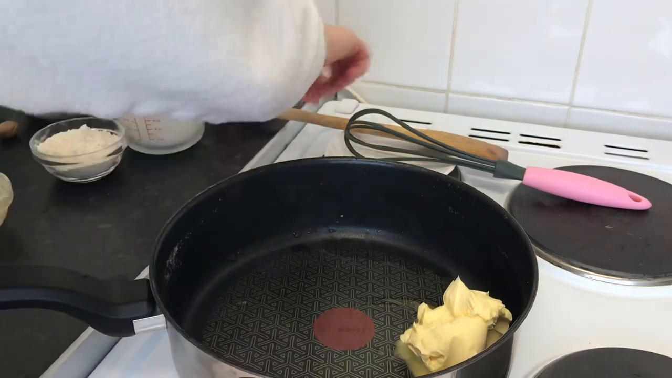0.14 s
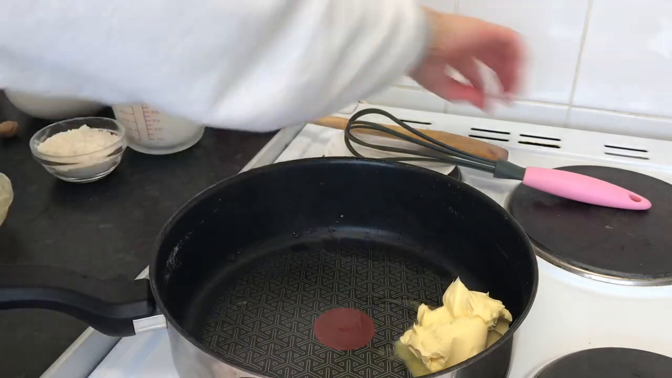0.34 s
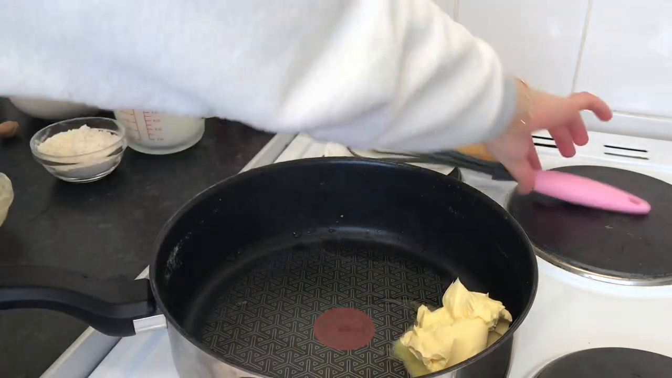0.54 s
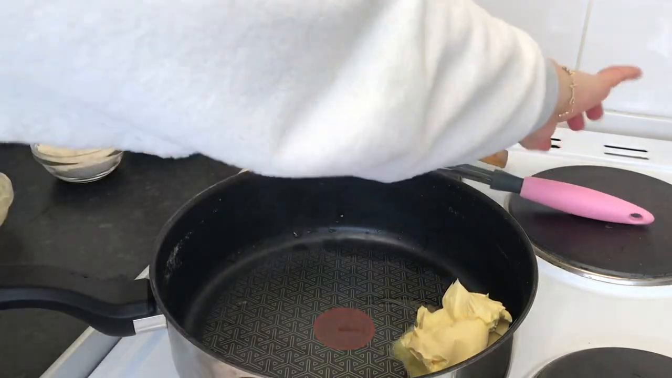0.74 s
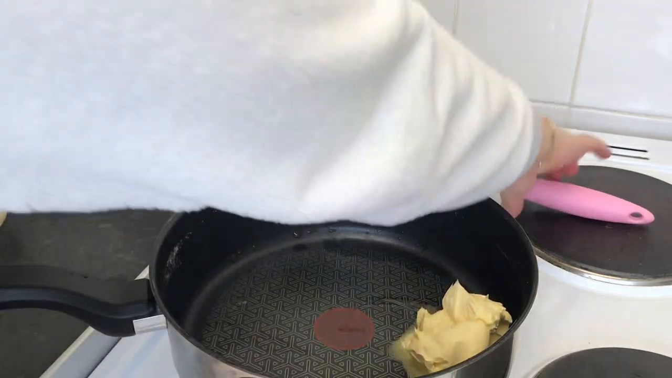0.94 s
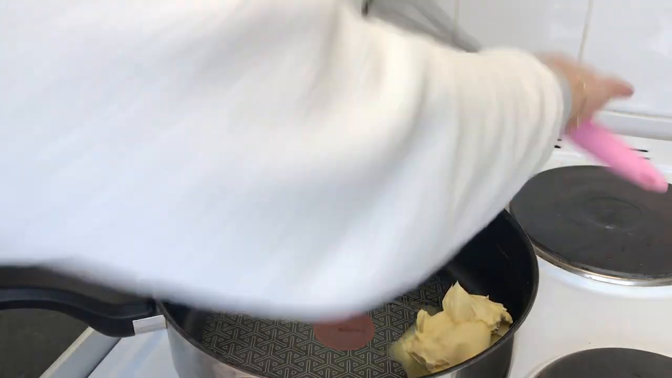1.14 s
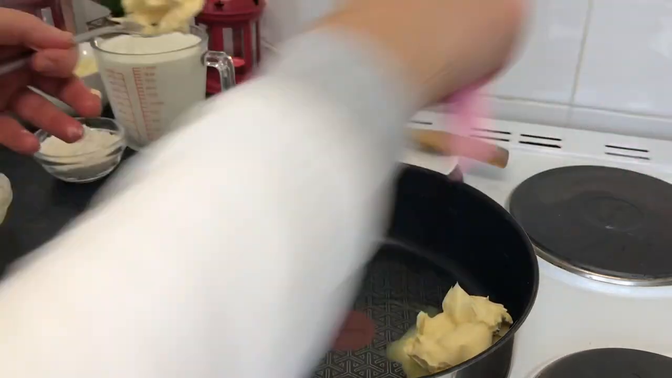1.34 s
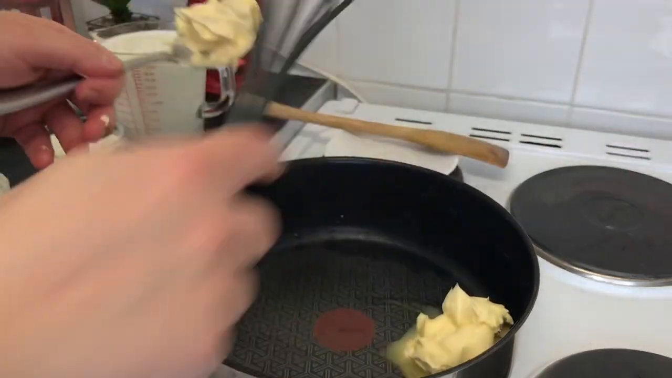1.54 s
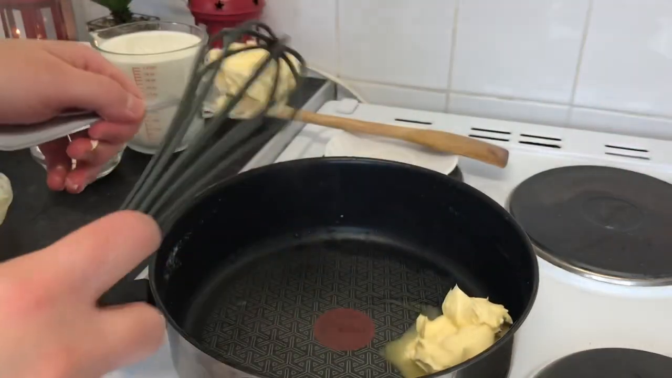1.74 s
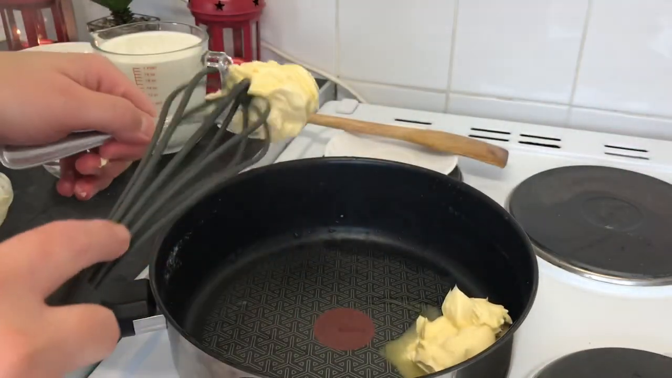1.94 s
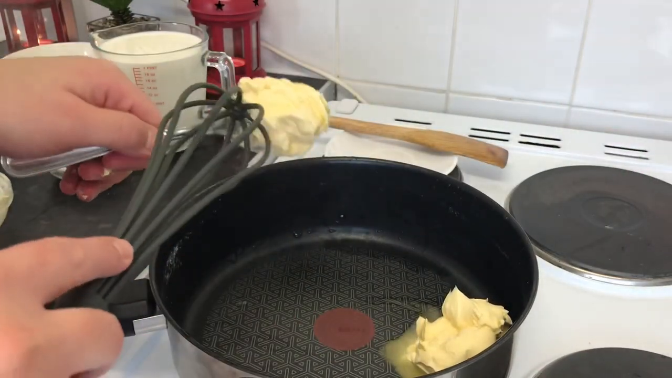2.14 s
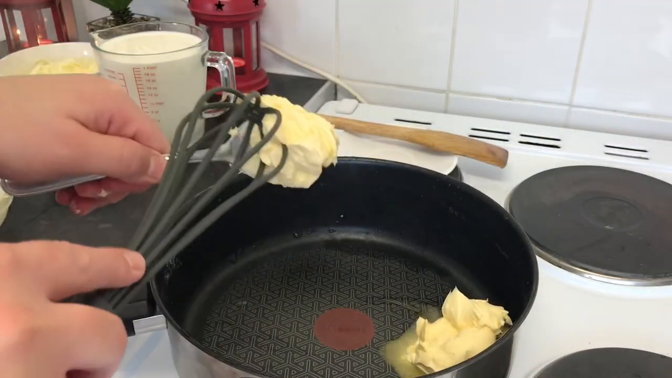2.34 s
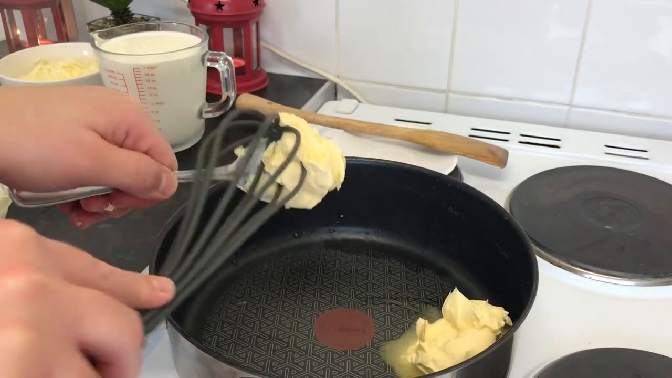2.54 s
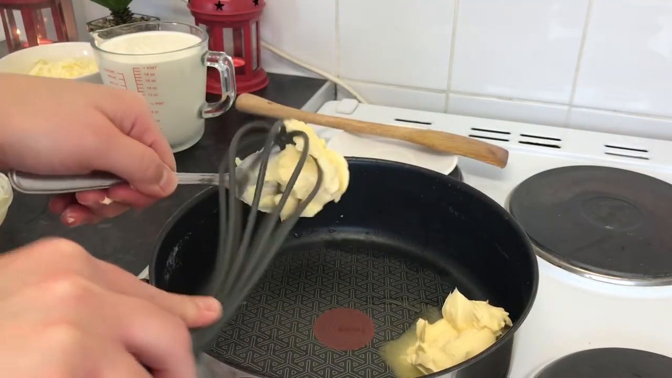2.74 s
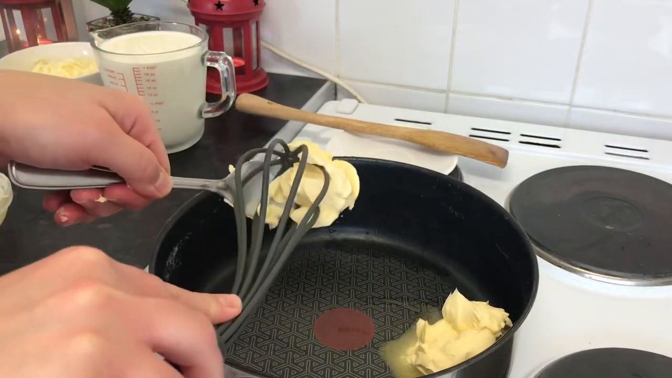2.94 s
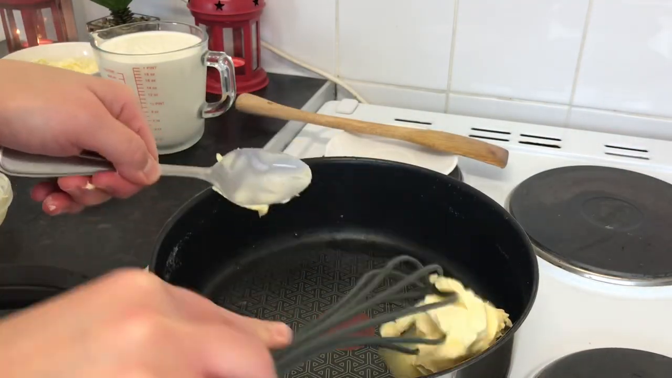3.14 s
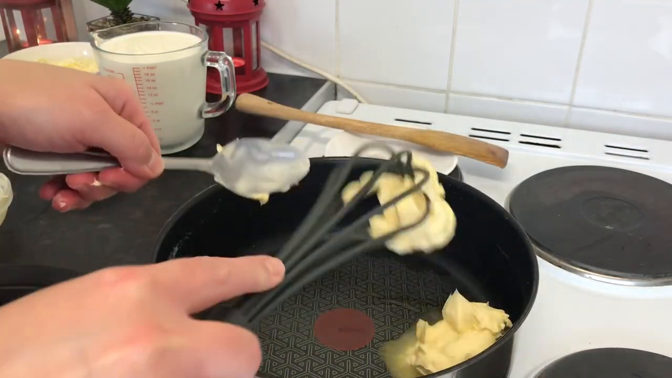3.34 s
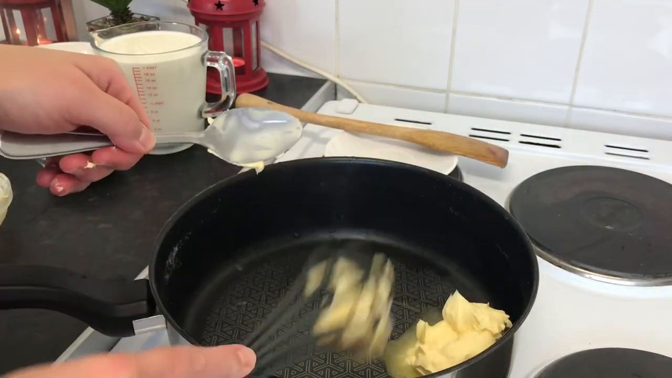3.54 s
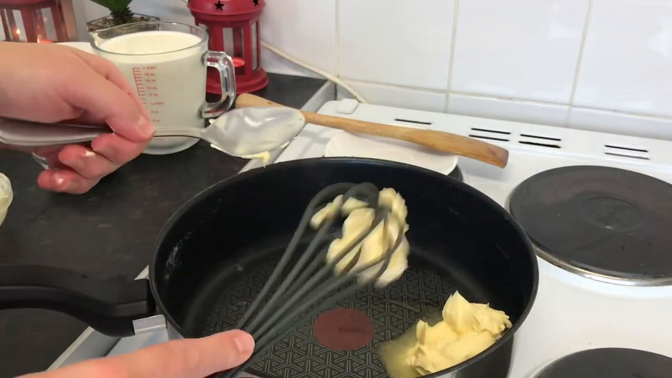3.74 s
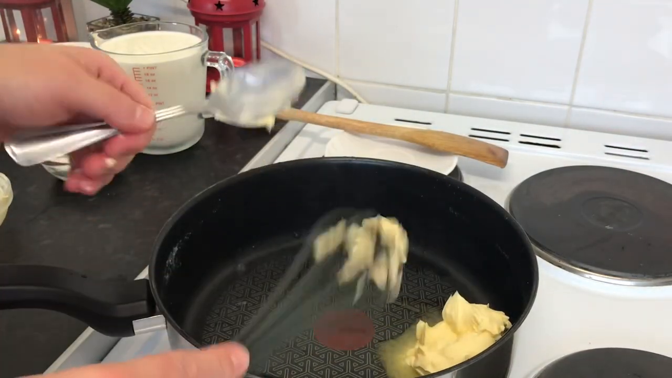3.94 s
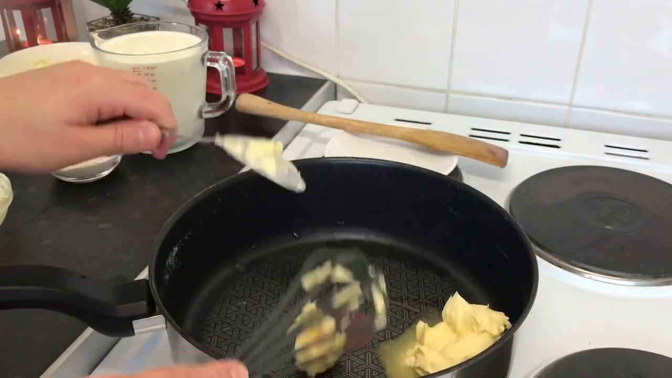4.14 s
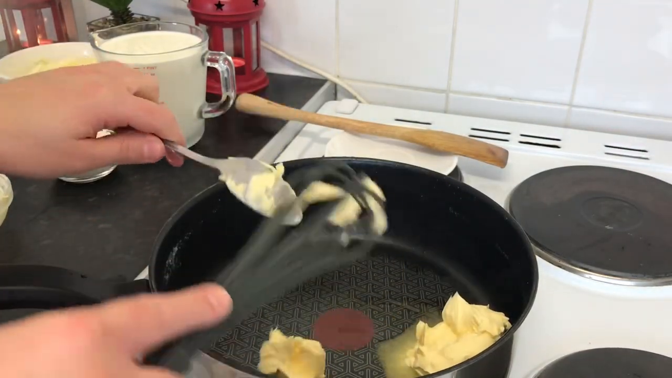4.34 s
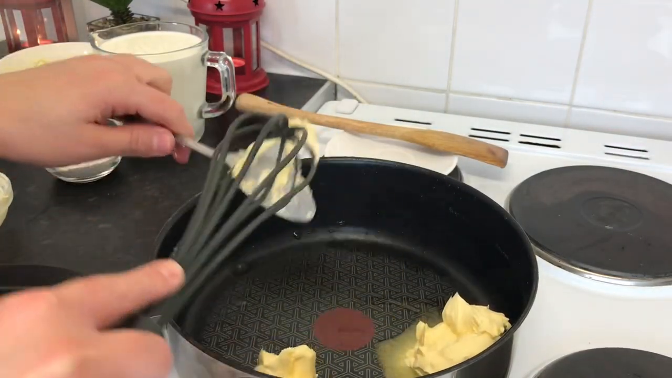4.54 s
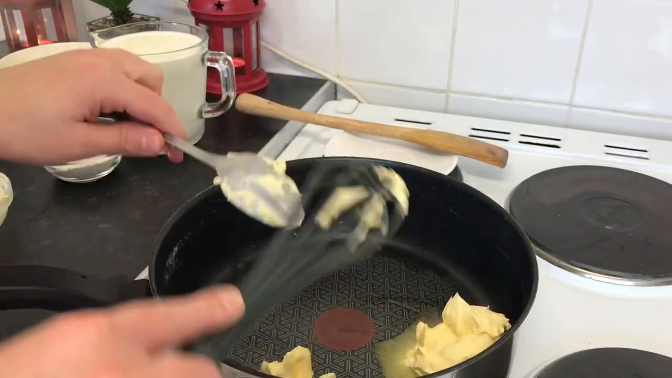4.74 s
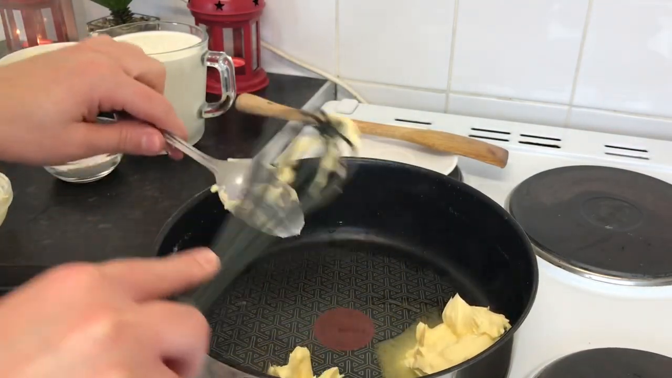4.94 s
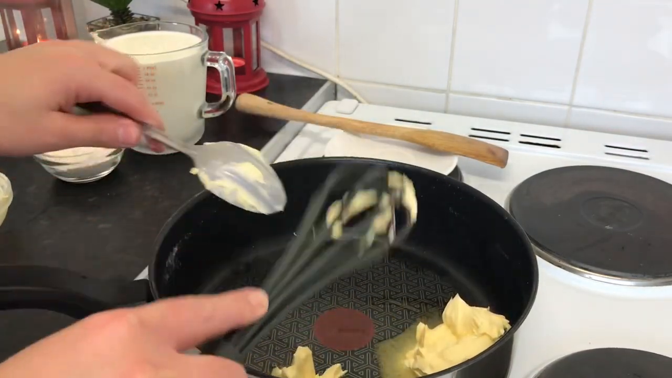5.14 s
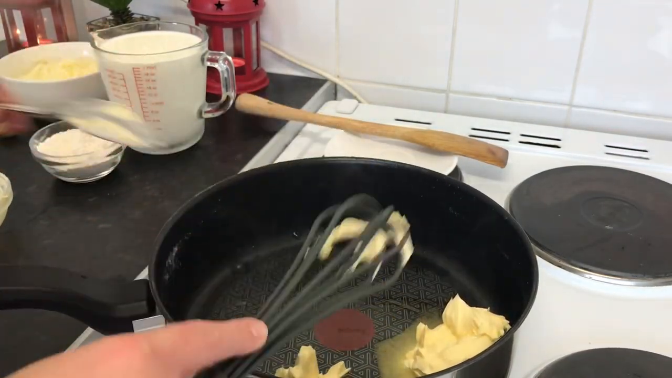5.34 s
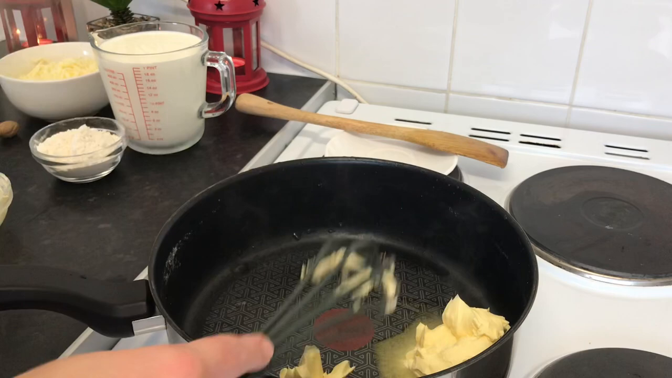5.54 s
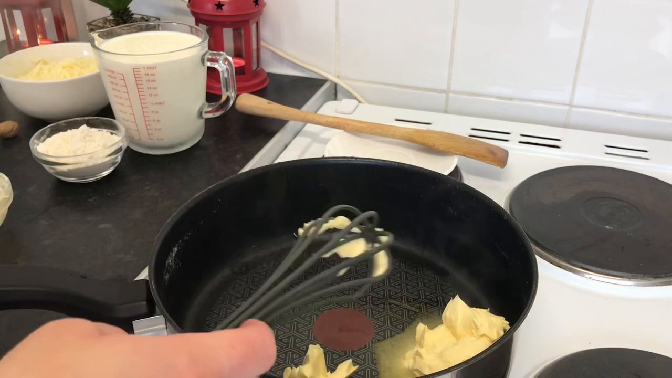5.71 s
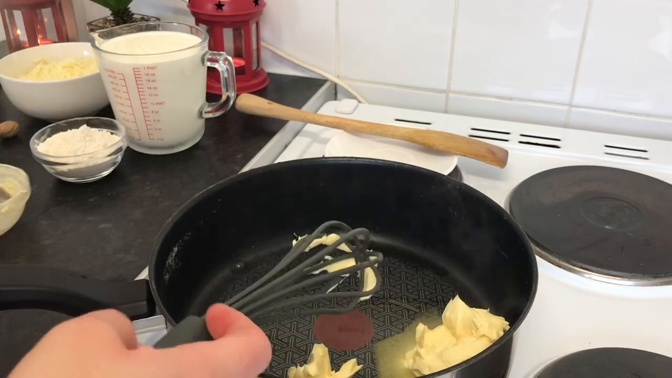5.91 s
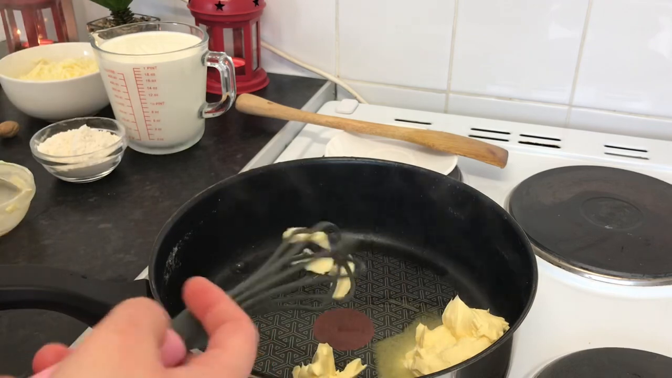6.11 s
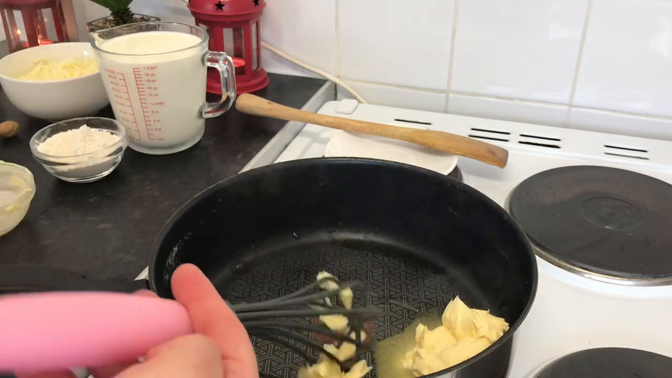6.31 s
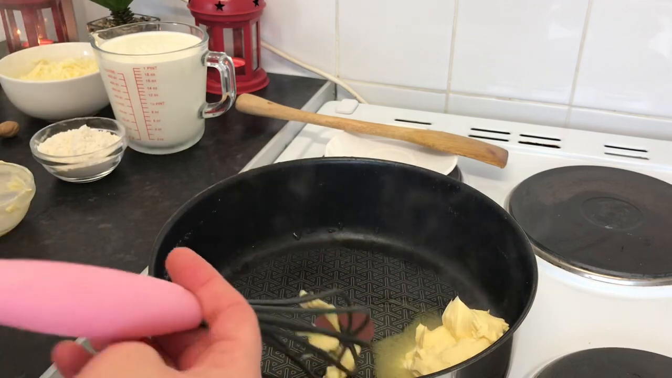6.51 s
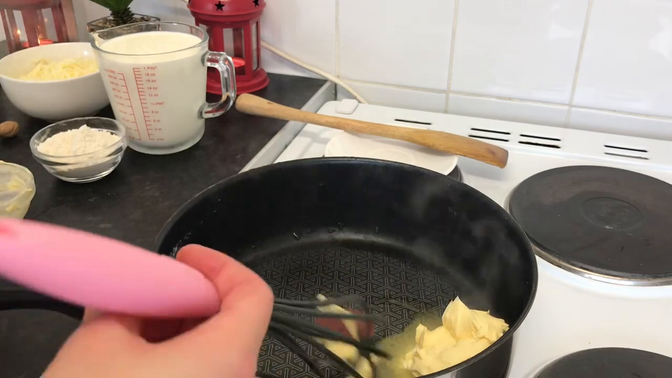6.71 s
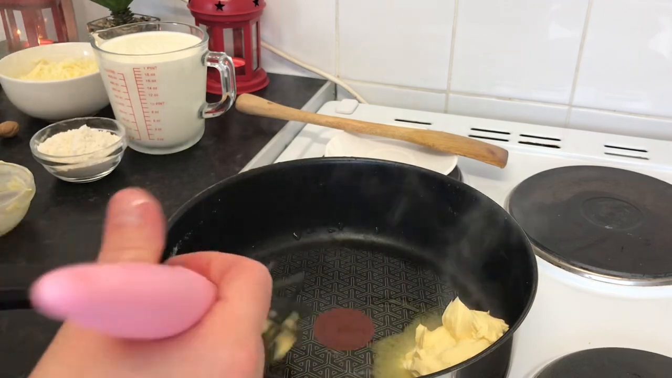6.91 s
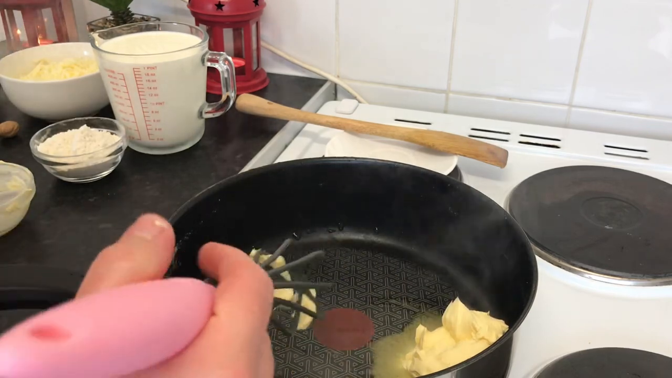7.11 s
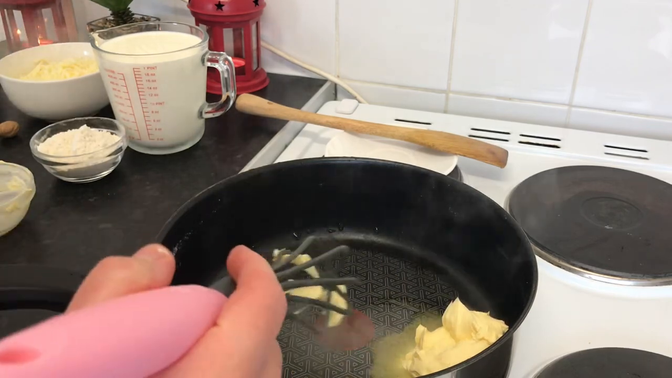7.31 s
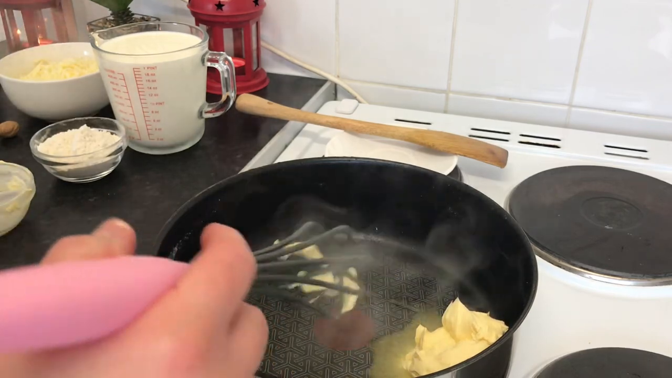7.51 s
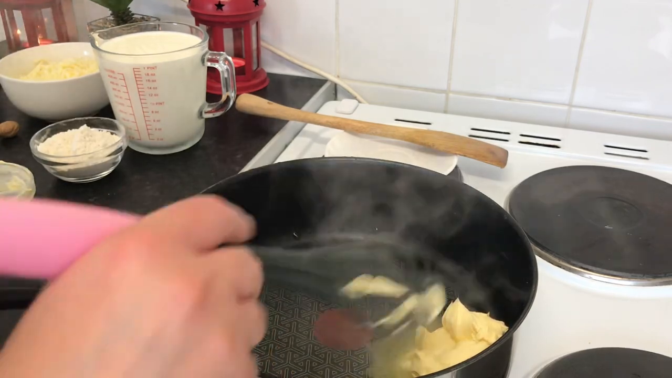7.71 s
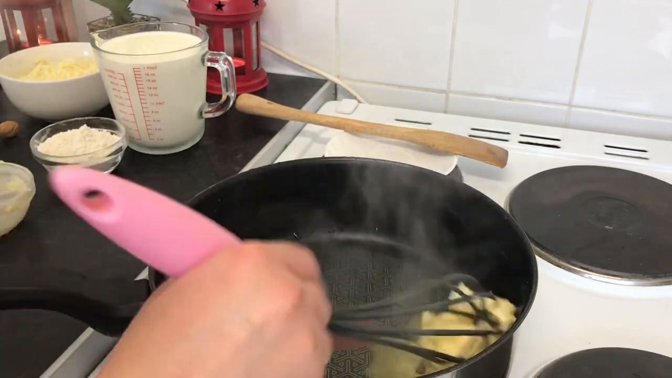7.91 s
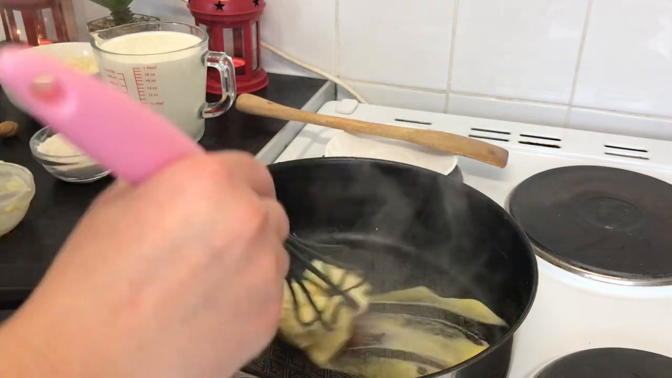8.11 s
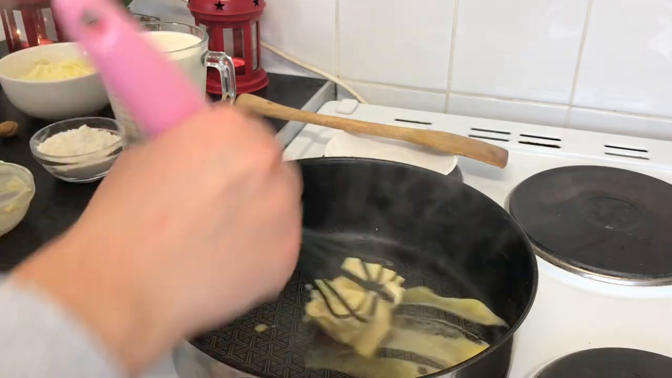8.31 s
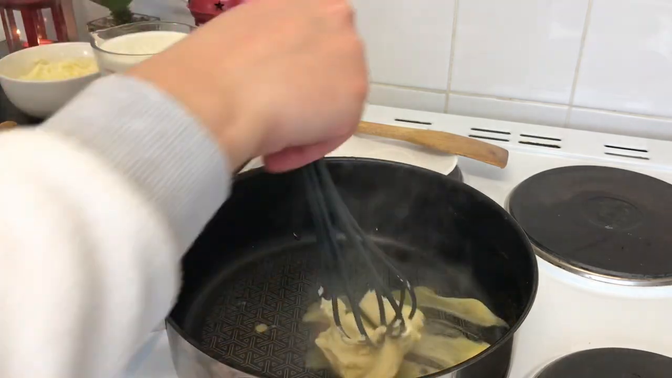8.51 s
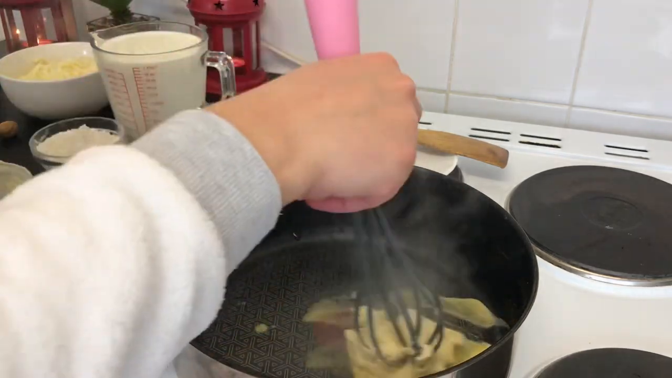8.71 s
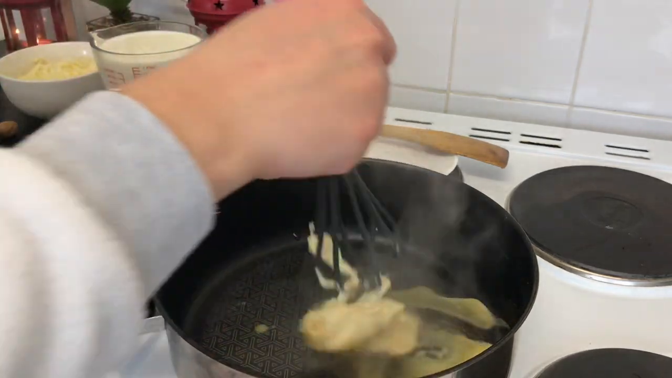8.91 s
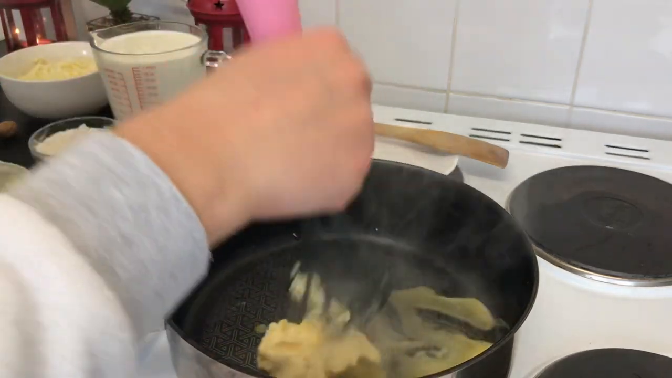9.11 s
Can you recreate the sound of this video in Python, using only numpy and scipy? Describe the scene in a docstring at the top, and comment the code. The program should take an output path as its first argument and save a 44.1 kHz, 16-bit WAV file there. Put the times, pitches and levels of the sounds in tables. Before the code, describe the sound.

Butter sizzles ever louder in a hot pan while a wire whisk is shaken, knocked on the pan, then stirred through the fizzing fat.

```python
"""Butter sizzles louder and louder in a hot nonstick pan, over a low room rumble and mains hum: crowds of random pops.
Early on a whisk bumps and scrapes the hob as it is picked up: coloured noise that dies away, and stick-slip pops.
Then it is shaken to fling butter off: its wires clash (noise through resonances) over dull thuds.
Next it knocks on the pan and bounces: clicks, pings and a ring of many sine waves.
Last it is stirred through the butter, which fizzes: quick narrow bands of pops that climb in pitch."""
import sys
import numpy as np
from scipy import signal
from scipy.fft import rfft, irfft, next_fast_len
from scipy.io import wavfile
from scipy.ndimage import map_coordinates

SR = 44100
rng = np.random.default_rng(int(sys.argv[2]) if len(sys.argv) > 2 else 0)


def materialize(psi):
    """Save the field psi as 16-bit PCM at rate SR to the path in sys.argv[1].

    A 1-D psi becomes a single channel; in a 2-D psi each row is a channel.
    """
    bounded = np.clip(np.atleast_2d(psi).T, -1, 1)
    quanta = np.round(bounded * 32767).astype(np.int16)
    wavfile.write(sys.argv[1], SR, quanta)


N = 403956  # length of the scene [samples]


def amp(db):
    """Turn decibels into a gain."""
    return np.exp(np.asarray(db) * np.log(10) / 20)


def unit(x):
    """Scale to an rms level of 1."""
    return x / np.sqrt(np.mean(x ** 2) + 1e-20)


def along(points, hz):
    """Read values between (frequency, value) points on a log frequency axis."""
    f, v = np.transpose(points)
    return np.interp(np.log(hz + 1), np.log(f + 1), v)


def wobble(rate):
    """A smooth random curve with rate random points a second."""
    count = int(N * rate / SR) + 2
    curve = map_coordinates(rng.standard_normal(count + 1), [np.linspace(0, count, 8 * count)])
    return np.interp(np.arange(N), np.linspace(0, N, len(curve)), curve)


def swell(s, half):
    """A bell curve in time: 1 at s, and 37 % at half seconds to either side."""
    return np.exp(-((np.arange(N) / SR - s) / half) ** 2)


def fade(rise, t60):
    """One second of a quick rise that dies away, by 60 dB in t60 seconds."""
    t = np.arange(SR) / SR
    return (1 - np.exp(-t / rise)) * np.exp(-np.log(1000) * t / t60)


def filtered(x, response):
    """Shape x with a gain for each frequency."""
    n = x.shape[-1]
    m = next_fast_len(n + SR // 4)
    return irfft(rfft(x, m) * response(np.fft.rfftfreq(m, 1 / SR)), m)[..., :n]


def peak(hz, centre, width):
    """Gain of one smooth peak, as of a resonance; width is half its bandwidth."""
    return 1 / np.sqrt(1 + ((hz - centre) / width) ** 2)


def noise(response, size):
    """Coloured noise of rms 1."""
    return unit(filtered(rng.standard_normal(size), response))


def spread(response):
    """One second of stereo noise; only its treble differs a little between the channels."""
    side = filtered(noise(response, SR), lambda hz: .25 * (hz > 4000))
    return noise(response, SR) + np.array([side, -side])


def dying(x, t60s):
    """Let each frequency of x die away at its own speed."""
    hz, t, z = signal.stft(x, SR, nperseg=256)
    z = z * np.exp(-np.log(1000) * t / along(t60s, hz)[:, None])
    return signal.istft(z, SR)[1][:len(x)]


def pops(rate, scatter_db, size=N):
    """Clicks at random moments, about rate a second, in unequal sizes."""
    bursts = rng.random(size) < rate / SR
    sizes = amp(scatter_db * rng.standard_normal(size))
    return unit(bursts * rng.choice([-1, 1], size) * sizes)


def add(track, s, sound):
    """Mix a sound into the track at time s."""
    part = track[..., round(s * SR):][..., :sound.shape[-1]]
    part += sound[..., :part.shape[-1]]


# colour of the low rumble: (frequency [Hz], relative level [dB per Hz])
RUMBLE_COLOUR = [(20, -28), (45, -6), (70, 3.5), (100, -6.5), (130, -6), (190, -3.5), (300, -5.5),
                 (500, -17.5), (1000, -20.5), (3000, -43)]
# mains hum: (frequency [Hz], level at the start [dB], level at the end [dB])
MAINS_HUM = [(99.5, -68, -67), (149, -73, -61.5), (197, -73, -71.5)]


def room_tone():
    """A low rumble of noise, with mains hum whose strength and pitch waver."""
    t = np.arange(N) / SR
    hum = np.zeros(N)
    for hz, start_db, end_db in MAINS_HUM:
        level_db = np.linspace(start_db, end_db, N) + 2.5 * wobble(3.3)
        hum += amp(level_db) * np.sqrt(2) * np.sin(2 * np.pi * hz * t + .5 * wobble(4))
    return hum + amp(-62) * noise(lambda hz: amp(along(RUMBLE_COLOUR, hz)), N)


# how long the room's answer lasts: (frequency [Hz], time to die by 60 dB [s])
ROOM_DECAY = [(150, 0.84), (1000, 0.18), (4000, 0.42), (12000, 0.14)]


def kitchen(x):
    """The tiled room answers with a dense tail that builds up over a few milliseconds."""
    tail = dying(rng.standard_normal(SR), ROOM_DECAY) * fade(rise=0.0046, t60=11)
    return signal.fftconvolve(x, tail / np.linalg.norm(tail))[:N]


# soft hollow tones: (middle [s], half length [s], frequency [Hz], level at the middle [dB])
SOFT_BOOMS = [(1.88, 0.048, 260, -55), (4.3, 0.16, 123, -50), (5.46, .04, 150, -48), (5.61, .05, 148, -45),
              (8.193, 0.056, 133.5, -55), (8.932, 0.1, 150.8, -53)]


def booms():
    """Things that are moved about boom softly: low tones with an unsteady pitch."""
    t = np.arange(N) / SR
    out = np.zeros(N)
    for s, half, hz, db in SOFT_BOOMS:
        tone = np.sqrt(2) * np.sin(2 * np.pi * hz * t + 0.58 * wobble(30))
        out += amp(db) * swell(s, half) * tone
    return out


# sharp resonances of the sheet-metal case: (frequency [Hz], half width [Hz], boost [dB])
CASE_RESONANCES = [(122, 6.1, 2), (150.3, 4.4, 11), (221, 13, 4.5), (374, 9, 14.5), (443, 12, 8),
                   (565, 32, 5), (920, 21, 2.5), (1190, 35, 6)]


def stove_case(hz):
    """Gain of the stove's panels: flat, with sharp resonances standing out."""
    return 1 + sum((amp(db) - 1) * peak(hz, f, width) ** 2 for f, width, db in CASE_RESONANCES)


# whisk on the hob's metal top:
# (time [s], level before the fade [dB], rise [s], time to die by 60 dB [s], brightness [dB per octave])
BUMPS = [(0.641, -49, .006, .3, 3), (.674, -39.5, 0.0037, 0.58, -3.5), (0.68, -25.5, 0.00071, 0.091, 4),
         (1.062, -39, 0.073, 0.8, -4.5), (1.066, -49, 0.0035, 0.3, 1)]
# colour of a bump before the case resonances: (frequency [Hz], relative level [dB per Hz])
HOB_COLOUR = [(60, -34), (150, -11.5), (300, -9.5), (450, -7), (570, 1.5), (760, -10), (930, -4), (1200, 0),
              (1550, -4.5), (2300, -17), (3050, -13), (4200, -25), (12000, -45)]
# the wires skid over the hob: (time [s], level before the fade [dB], time to die by 60 dB [s])
SKIDS = [(.69, -44, .3), (1.08, -52, .9)]
SCRAPE_HZ, SCRAPE_WIDTH_HZ = 1400, 520


def handling():
    """The whisk bumps the hob, then its wires stick and slip over it as it is lifted."""
    out = np.zeros(N)
    for s, db, rise, t60, tilt_db in BUMPS:
        def colour(hz):
            """The metal top's colour, tilted darker or brighter around 1 kHz."""
            tilt = tilt_db * np.log2((hz + 1) / 1000)
            return amp(along(HOB_COLOUR, hz) + tilt) * stove_case(hz)
        add(out, s, amp(db) * noise(colour, SR) * fade(rise, t60))
    for s, db, t60 in SKIDS:
        slips = pops(rate=260, scatter_db=3, size=SR)
        slips = filtered(slips, lambda hz: peak(hz, SCRAPE_HZ, SCRAPE_WIDTH_HZ) ** 3)
        add(out, s, amp(db) * unit(slips) * fade(rise=.012, t60=t60))
    return out


# small ticks and clinks of whisk and spoon:
# (time [s], level before the fade [dB], frequency [Hz], half width [Hz], time to die by 60 dB [s])
CLINKS = [(.712, -36, 6100, 140, 0.1), (.716, -41, 8350, 150, 0.1), (1.526, -45, 5510, 100.3, .15),
          (3.177, -20.5, 12500, 5000, 0.017), (5.117, -32, 13000, 4000, 0.02),
          (5.869, -22, 12800, 110, 0.09), (5.869, -15, 11500, 3500, .016), (6.095, -22, 7200, 1500, .045)]


def ticks():
    """Single bright clicks and clinks: short noise through one resonance."""
    out = np.zeros((2, N))
    for s, db, hz, width, t60 in CLINKS:
        add(out, s, amp(db) * spread(lambda f: peak(f, hz, width) ** 2) * fade(0.00039, t60))
    return out


# shakes of the whisk: (time [s], clash level before the fade [dB], thud level before the fade [dB],
# extra strength of the lowest wire resonance [dB], brightness [dB per octave], clash rise [s])
FLICKS = [(3.7395, -14.5, -41.3, 0, 0, .004), (3.9214, -15.3, -39.5, -2, -0.5, .002),
          (4.0855, -13, -34.5, -2, 0, .002), (4.2635, -23.5, -45, 0, -3, .002),
          (5.3725, -14.8, -37.5, 9, 1.5, .0015), (5.5312, -12, -33.3, -4, 1.5, .003)]
# resonances of the wires, lowest first: (frequency [Hz], full width [Hz], relative level [dB])
WIRE_RESONANCES = [(4180, 240, -9), (5560, 260, 1), (6150, 380, 0.5), (7000, 280, 5), (8280, 240, -3.5),
                   (9200, 400, -7.5), (10050, 240, -7), (11400, 330, -9), (12800, 300, -5.5),
                   (14800, 1300, -12)]
# colour of a thud before the case resonances: (frequency [Hz], relative level [dB per Hz])
THUD_COLOUR = [(30, -21), (65, -7.5), (110, -5.5), (160, -2.5), (240, -8.5), (450, -12.5), (750, -6),
               (1200, -11.5), (2000, -14), (4000, -45)]
# how long a thud lasts: (frequency [Hz], time to die by 60 dB [s])
THUD_DECAY = [(120, 1.6), (330, 1.05), (1000, 0.58), (3000, 0.26)]


def shakes():
    """Each flick makes the wires chatter together; a dull thud in the stove swells up more slowly."""
    clashes, thuds = np.zeros((2, N)), np.zeros(N)
    lowest_hz = WIRE_RESONANCES[0][0]
    for s, clash_db, thud_db, lowest_db, tilt_db, rise in FLICKS:
        # the wires meet at a new place each time, which shifts the balance of their resonances
        strengths_db = [db + rng.normal(0, 1) + tilt_db * np.log2(f / lowest_hz)
                        for f, width, db in WIRE_RESONANCES]
        strengths_db[0] += lowest_db

        def wires(hz):
            """All the wire resonances, added as powers."""
            rows = zip(WIRE_RESONANCES, strengths_db)
            return np.sqrt(sum((amp(db) * peak(hz, f, width / 2)) ** 2 for (f, width, _), db in rows))
        # they meet hard, then buzz on more weakly
        chatter = fade(rise, t60=0.047) + amp(-12) * fade(rise=0.0055, t60=0.075)
        add(clashes, s, amp(clash_db) * spread(wires) * chatter)
        thud = noise(lambda hz: amp(along(THUD_COLOUR, hz)) * stove_case(hz), SR)
        thud = dying(thud, THUD_DECAY) * fade(rise=0.013, t60=14)
        add(thuds, s, amp(thud_db) * thud)
    return clashes, thuds


# ringing tones of the pan: (frequency [Hz], relative level [dB], time to die by 60 dB [s])
PAN_TONES = [(529, -8, 0.2), (568, -14, 0.25), (649, -17, 0.45), (806, -13, 0.2), (926, -8, 0.29),
             (978, -4, 0.35), (1093, -3.5, 0.41), (1205, -3, 0.24), (1244, -9, 0.2), (1320, -9, 0.32),
             (1378, -13, 0.5), (1448, -3, 0.19), (1487, -13, 0.3), (1561, -6, 0.3), (1615, -6.5, 0.29),
             (1670, -6, 0.25), (1740, -10, 0.3), (1801, -7, 0.17), (1865, -8, 0.2), (1899, -11, 0.3),
             (1960, -1.5, 0.2), (2023, -5, 0.23), (2141, -12, 0.22), (2199, -13, 0.22), (2487, -17, 0.2),
             (3152, -14, 0.24)]


def pan_ring(dull_db):
    """The pan's tones, at new strengths for each blow; the upper ones are dull_db weaker."""
    t = np.arange(SR // 2) / SR
    ring = np.zeros(len(t))
    for hz, db, t60 in PAN_TONES:
        level_db = db + rng.normal(0, 1) - dull_db * (hz > 1350)
        ring += amp(level_db - 60 * t / t60) * np.sin(2 * np.pi * (hz * t + rng.random()))
    # its first 50 ms set the level
    return np.pad(ring / ring[:SR // 20].std(), (0, SR - len(t)))


# three knocks with their bounces: (time [s], level of clatter and hardest ring before the fade [dB],
# click level before the fade [dB], ping level before the fade [dB], ping frequency [Hz])
PAN_CONTACTS = [(5.869, -22, -12.5, -19, 11520), (5.8865, -21.8, -16, -31, 11520),
                (5.897, -31, -22, -40, 11520), (6.0949, -32.5, -22, -25, 9000),
                (6.103, -42, -24, -30, 9000), (6.114, -38, -29, -40, 9000), (6.472, -34, -25.5, -40, 9000),
                (6.572, -39, -30, -50, 9000), (6.651, -42.5, -35, -55, 9000), (6.703, -47, -39, -55, 9000)]
# colour of the click of whisk on pan: (frequency [Hz], relative level [dB per Hz])
CLICK_COLOUR = [(200, -22), (500, 3), (1300, 10), (2000, 11), (3200, 4.5), (7000, 2), (11000, -4),
                (16000, -8)]
# colour of the pan's clatter: (frequency [Hz], relative level [dB per Hz])
CLATTER_COLOUR = [(60, -27), (130, -9), (220, -28), (300, -9), (400, -8), (530, 2), (740, -12),
                  (1000, -0.5), (1230, 0.5), (1500, -2), (2050, -1.5), (2600, -9), (3200, -8), (5000, -11),
                  (12000, -23)]
# how long the clatter lasts: (frequency [Hz], time to die by 60 dB [s])
CLATTER_DECAY = [(200, 0.16), (700, 0.24), (1700, 0.29), (2800, 0.078), (8000, 0.1)]


def knocks():
    """The whisk strikes the pan and bounces: each contact is a click, a ping of one wire, and the pan's ring."""
    out = np.zeros((2, N))
    hardest_db = max(row[1] for row in PAN_CONTACTS)
    for s, ring_db, tick_db, ping_db, ping_hz in PAN_CONTACTS:
        # a softer blow wakes the tones less, above all the upper ones
        softer_db = hardest_db - ring_db
        ring = amp(-.2 * softer_db) * pan_ring(dull_db=0.37 * softer_db)
        # the dense, quickly dying tones blur into a short clatter
        clatter = dying(noise(lambda hz: amp(along(CLATTER_COLOUR, hz)), SR), CLATTER_DECAY)
        body = amp(ring_db) * (amp(-3.2) * ring + clatter) * fade(rise=.0012, t60=30)
        tick = spread(lambda hz: amp(along(CLICK_COLOUR, hz))) * fade(rise=0.0003, t60=0.03)
        ping = spread(lambda hz: peak(hz, ping_hz, width=110) ** 2) * fade(rise=.0003, t60=0.115)
        add(out, s, body + amp(tick_db) * tick + amp(ping_db) * ping)
    return out


def reflected(x, wet_db, t60):
    """Pan wall, hob and tiles send back a dense crowd of close copies that colour the sound finely."""
    answer = rng.standard_normal(SR) * fade(0.00046, t60)
    answer *= amp(wet_db) / np.linalg.norm(answer)
    answer[0] = 1  # the direct sound
    return signal.fftconvolve(x, answer / np.linalg.norm(answer))[:N]


# colour of bursting bubbles: (frequency [Hz], relative level [dB per Hz])
BURST_COLOUR = [(150, -27.5), (450, -21), (900, -13.5), (1300, -12), (2200, -8), (3200, -5), (4500, 0),
                (6200, 0.5), (8000, -0.5), (11000, -3.5), (15700, -4)]
# peaks and notches from the hollow of the pan: (frequency [Hz], width of the bell curve [Hz], boost [dB])
HOLLOW_RIPPLE = [(500, 15, -10), (893, 61, -8), (1166, 14, 7), (1478, 44, -5), (1915, 68, 3),
                 (2080, 48, -3), (2256, 170, -4.5), (2654, 23, 5.5), (3440, 50, -4), (3820, 70, -4),
                 (4330, 150, 1.4), (5040, 87, -5), (5450, 95, 3.5), (5760, 60, -3), (6100, 100, 2.5),
                 (6550, 220, 2), (7450, 330, -2.6), (9160, 570, -1.8), (10390, 400, -5), (12594, 400, 1.5)]


def pan_hollow(hz):
    """The colour of a burst, heard with its reflections from the floor and wall of the pan."""
    grid = np.linspace(0, SR / 2, 4096)
    ripple = sum(db * np.exp(-.5 * ((grid - f) / width) ** 2) for f, width, db in HOLLOW_RIPPLE)
    return np.interp(hz, grid, amp(along(BURST_COLOUR, grid) + ripple))


BOILING_S = 6.8  # the steady growth with heat ends here
# growth of each size of bubble until then [dB per s]; the spits grow like the fine ones
COARSE_DB_PER_S, FINE_DB_PER_S, MIST_DB_PER_S = 1.8573, 1.944, 2.33
SPIT_DB = -67  # level of the spits at the start


def spits():
    """Now and then a larger bubble spits, louder as the butter heats."""
    heated_s = np.minimum(np.arange(N) / SR, BOILING_S)
    cracks = filtered(pops(rate=14, scatter_db=2), lambda hz: pan_hollow(hz) * (hz > 1500))
    return amp(SPIT_DB + FINE_DB_PER_S * heated_s) * unit(cracks)


def band_swell(s, half, hz, width, db):
    """A narrow band of the sizzle swells and fades: random pops filtered around one frequency."""
    during = np.abs(np.arange(N) / SR - s) < 2 * half
    out = np.zeros(N)
    bursts = pops(rate=3000, scatter_db=2)[during]
    out[during] = unit(filtered(bursts, lambda f: peak(f, hz, width) ** 2))
    return amp(db) * swell(s, half) * out


# each quick swish in a stroke is higher and wider in pitch than the one before
SWISH_GAP_S, SWISH_HALF_S, SWISH_HZ, SWISH_WIDTH_HZ = 0.075, 0.062, 2660, 200
SWISH_RISE, SWISH_WIDENS = 1.08, 1.4  # pitch and width, as factors over the swish before
SWISH_LOSS_DB = 2  # each is this much weaker than the last


def stroke(start, db, count):
    """The whisk pushes butter along: a short run of quick swishes that climbs in pitch."""
    out = np.zeros(N)
    times = start + SWISH_GAP_S * np.arange(count)
    for k, s in enumerate(times[times < N / SR]):
        hz = SWISH_HZ * SWISH_RISE ** k
        width = SWISH_WIDTH_HZ * SWISH_WIDENS ** k
        out += band_swell(s, SWISH_HALF_S, hz, width, db - k * SWISH_LOSS_DB)
    return out


# narrow bands of the sizzle that swell and fade, some over seconds, some quickly:
# (middle [s], half length [s], frequency [Hz], half width [Hz], level before the swell [dB])
BAND_SWELLS = [(2.2, 1.5, 5480, 70, -56), (3, 1.1, 4330, 200, -56), (5, 1.1, 6400, 200, -45),
               (7.4, .8, 2650, 55, -55), (7.2, 0.54, 3190, 70, -51.5), (8.13, .06, 2000, 900, -48),
               (8.37, .09, 6000, 600, -39.5), (8.623, 0.21, 8300, 350, -44), (8.57, .06, 3500, 600, -43),
               (8.78, .06, 3400, 600, -41.5), (8.85, .08, 1600, 600, -45.5)]
# strokes of the whisk through the butter: (time [s], level of the first swish before the swell [dB])
WHISK_STROKES = [(8.57, -41), (9.07, -44)]


def swishes():
    """Narrow bands that stand out slowly in the sizzle, and quick swishes late on."""
    single = sum(band_swell(*row) for row in BAND_SWELLS)
    return single + sum(stroke(s, db, count=3) for s, db in WHISK_STROKES)


def bubbles(level_db, lo_hz, hi_hz, rate, scatter_db, clump_db):
    """One size of bubble: pops within a band, whose strength flickers as if they burst in brief clumps."""
    def band(hz):
        """The pan's colour between the two edges."""
        edges = (1 + (lo_hz / (hz + 1)) ** 16) * (1 + (hz / hi_hz) ** 16)
        return pan_hollow(hz) / np.sqrt(edges)
    clumps = amp(clump_db * (wobble(170) + 0.78 * wobble(25)))
    return amp(level_db) * unit(filtered(pops(rate, scatter_db) * clumps, band))


# the whisk spreads butter over bare hot metal and the mix of bubbles shifts to the finest:
# (time [s], rise [s], coarse change [dB], fine change [dB], mist change [dB])
BUTTER_SPREADS = [(6.1, 0.65, .2, -0.6, 3), (8.2, 0.15, 1.3, -1, 3.2)]
# brief dips, as when a sleeve passes over the pan: (middle [s], half length [s], treble loss [dB])
SIZZLE_DIPS = [(0.497, 0.56, 2.6), (1.334, 0.19, 4), (8.89, 0.12, 1.3)]
COARSE_DIP_SHARE = 0.29  # low sound bends round the arm
COARSE_DB, FINE_DB, MIST_DB = -55.6, -46.2, -50.5  # levels at the start, before any dip


def sizzle():
    """Water boils out of the butter, louder with heat; as it spreads, the tiniest bubbles take over."""
    t = np.arange(N) / SR
    heated_s = np.minimum(t, BOILING_S)
    dip_db = sum(db * swell(s, half) for s, half, db in SIZZLE_DIPS)
    coarse_step, fine_step, mist_step = sum(
        np.outer(steps_db, np.clip((t - s) / rise, 0, 1)) for s, rise, *steps_db in BUTTER_SPREADS)
    unrest_db = 0.35 * wobble(4)
    coarse_db = COARSE_DB + COARSE_DB_PER_S * heated_s + coarse_step - COARSE_DIP_SHARE * dip_db + unrest_db
    fine_db = FINE_DB + FINE_DB_PER_S * heated_s + fine_step - dip_db + unrest_db
    mist_db = MIST_DB + MIST_DB_PER_S * heated_s + mist_step - dip_db + unrest_db
    coarse = bubbles(coarse_db, lo_hz=198, hi_hz=3727, rate=12000, scatter_db=2.5, clump_db=0.67)
    fine = bubbles(fine_db, lo_hz=3770, hi_hz=10450, rate=26000, scatter_db=3.5, clump_db=0.9)
    mist = bubbles(mist_db, lo_hz=8930, hi_hz=17800, rate=30000, scatter_db=4, clump_db=0.5)
    return coarse + fine + mist


def scene():
    """Everything sits in the middle; the treble of sharp contacts differs slightly between the channels."""
    clashes, thuds = shakes()
    near = clashes + knocks() + ticks()
    moved = handling()
    echo = kitchen(amp(-9.5) * near.mean(0) + amp(-4.0) * moved)
    frying = reflected(sizzle() + spits() + swishes(), wet_db=-10.0, t60=0.15)
    return room_tone() + booms() + moved + echo + thuds + near + frying


TOP_HZ = 15800


def record(dry):
    """Nothing at or above the band limit is kept."""
    return filtered(dry, lambda hz: hz < TOP_HZ)


dry = scene()
out = record(dry)
materialize(out)
```